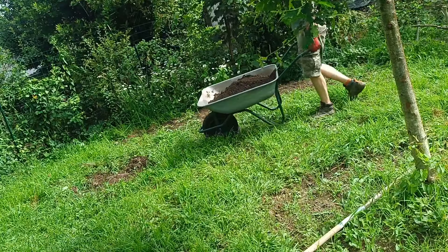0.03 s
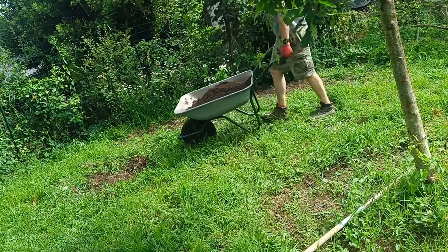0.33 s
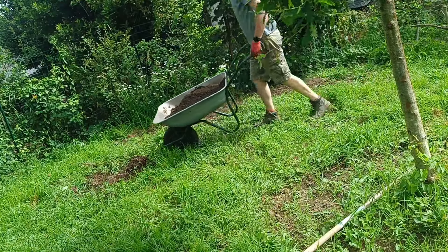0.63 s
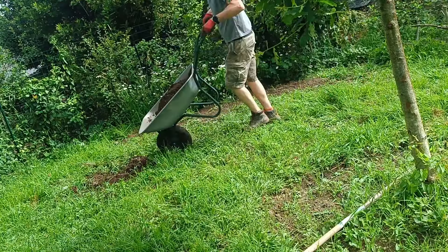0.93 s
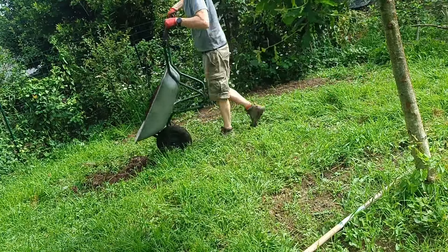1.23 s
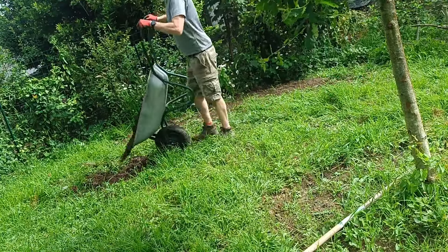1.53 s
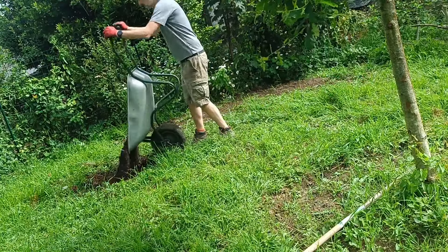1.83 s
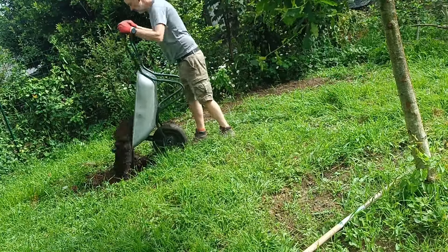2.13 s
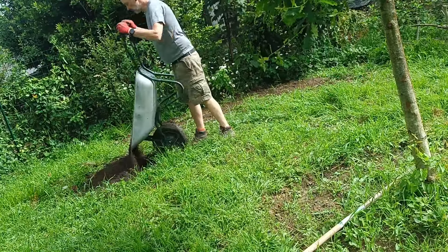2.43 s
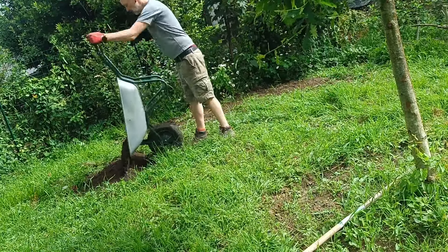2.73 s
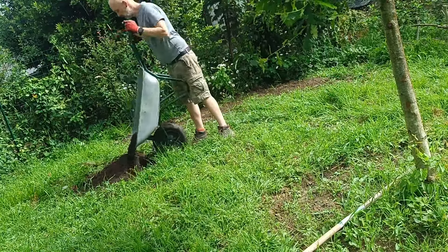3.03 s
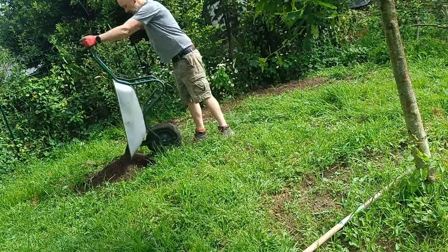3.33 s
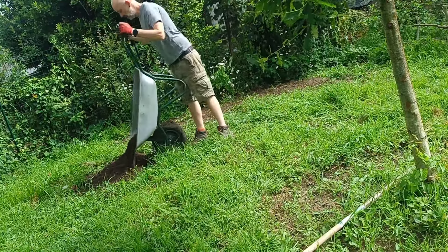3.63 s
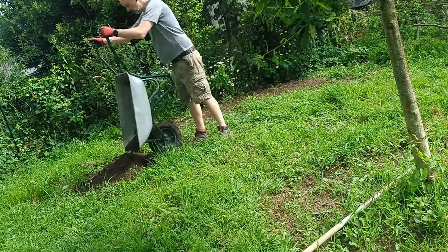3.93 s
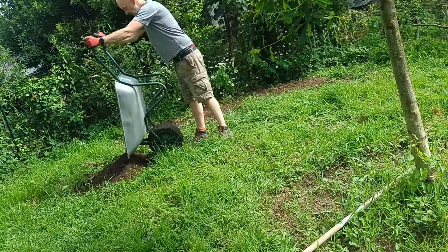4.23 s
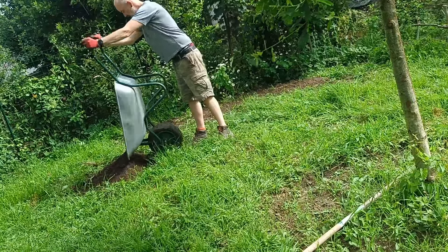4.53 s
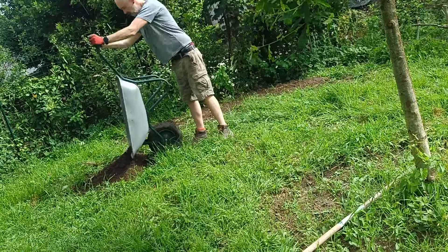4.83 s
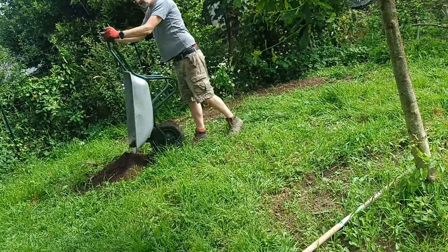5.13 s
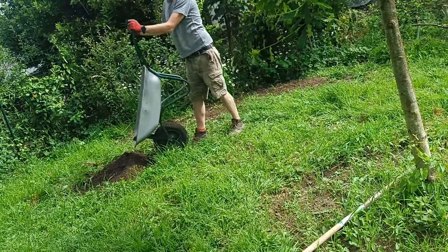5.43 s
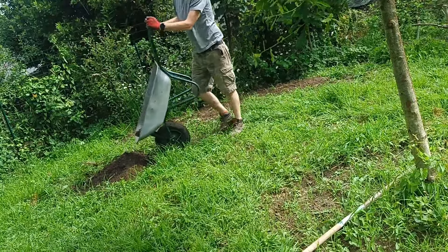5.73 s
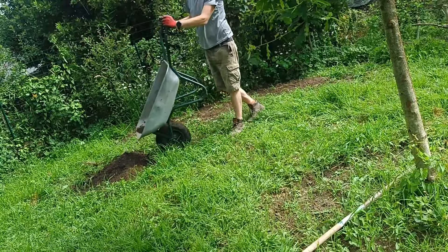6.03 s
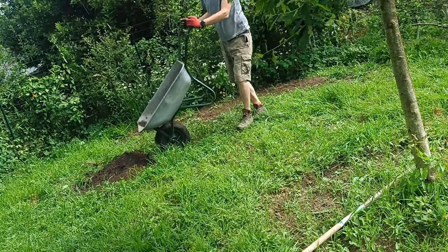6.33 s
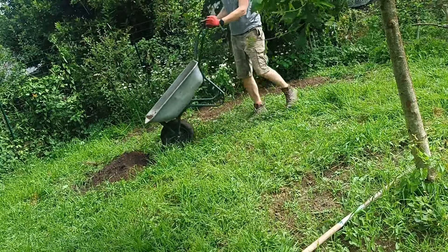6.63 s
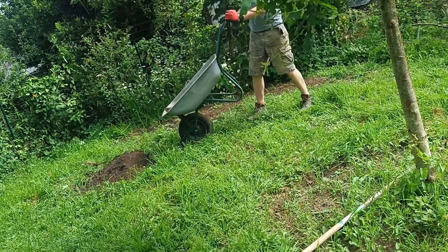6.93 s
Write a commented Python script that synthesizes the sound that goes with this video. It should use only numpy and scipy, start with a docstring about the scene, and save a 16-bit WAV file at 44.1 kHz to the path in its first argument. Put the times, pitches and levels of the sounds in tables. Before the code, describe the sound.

Close by, boots and a wheel brush through grass, then soil scrapes and slides out of a steel wheelbarrow in several pours. The tray clanks, and later rings with a quick cluster of knocks as it is emptied. Small birds trill and chirp in the garden hedges to the right, with a fluting song growing clearer in the second half. Light wind rumbles on the microphone, stronger toward the end.

```python
"""Tipping a wheelbarrow on a lawn

Close by on the left, boots and wheel brush the grass, soil slides off a steel tray in several pours,
and the tray rings as it is knocked empty. Further off to the right, small birds sing in the hedges,
their notes scattered by the foliage. A light wind buffets each of the two microphone ports on its own."""
import sys
import numpy as np
from scipy import signal
from scipy.fft import rfft, irfft, next_fast_len
from scipy.io import wavfile
from scipy.ndimage import map_coordinates

SR = 44100
rng = np.random.default_rng(int(sys.argv[2]) if len(sys.argv) > 2 else 0)


def materialize(psi):
    """Save the field psi as 16-bit PCM at rate SR to the path in sys.argv[1].

    A 1-D psi becomes a single channel; in a 2-D psi each row is a channel.
    """
    bounded = np.clip(np.atleast_2d(psi).T, -1, 1)
    quanta = np.round(bounded * 32767).astype(np.int16)
    wavfile.write(sys.argv[1], SR, quanta)


N = 308700
TIME = np.arange(N) / SR

# modes of the tray's steel panels: f/Hz, relative level/dB, t60/s
PANEL_MODES = [(260.5, -8, .45), (527, -3.5, 0.12), (651, -8.5, 0.26), (748, 1.5, 0.15), (842, -4.5, 0.22),
               (961, -11, 0.25), (1208, -10.5, 0.14), (1320, -2, 0.077), (1396, 3, 0.13)]
# how alike the barrow's direct sound is at the two ports: f/Hz, left-right correlation
NEAR_COHERENCE = [(800, 0.78), (7000, 0.078)]


def amp(db):
    """Decibels to gain."""
    return 10 ** (np.asarray(db) / 20)


def unit(x):
    """Scale to rms 1."""
    return x / np.sqrt(np.mean(x ** 2) + 1e-20)


def power_sum(gains):
    """Unrelated noises add by power."""
    return np.sqrt(sum(g ** 2 for g in gains))


def along(points, hz):
    """Read (f/Hz, value) points on a log frequency axis."""
    f, v = np.transpose(points)
    return np.interp(np.log(hz + 1), np.log(f + 1), v)


def curves(rows):
    """One value per sample for each column after the time."""
    s, *cols = np.transpose(rows)
    return [np.interp(TIME, s, c) for c in cols]


def wobble(rate, t=TIME):
    """A smooth random curve over the times t, rate knots a second."""
    return map_coordinates(rng.standard_normal(int(t[-1] * rate) + 4), [t * rate])


def surge(s, rise, hold, fall_db_per_s):
    """A gain that rises smoothly, holds, then dies away."""
    t = TIME - s
    onset = np.sin(np.pi / 2 * np.clip(t / rise, 0, 1)) ** 2
    return onset * amp(-fall_db_per_s * np.maximum(t - rise - hold, 0))


def filtered(x, response):
    """Pass x through a complex frequency response."""
    n = x.shape[-1]
    m = next_fast_len(n + 8192)
    return irfft(rfft(x, m) * response(np.fft.rfftfreq(m, 1 / SR)), m)[..., :n]


def add(track, s, sound):
    """Mix a sound into a track at time s."""
    part = track[..., max(round(s * SR), 0):][..., :sound.shape[-1]]
    part += sound[..., :part.shape[-1]]


def panned(side_db):
    """Left and right gains of mean power 1; positive side_db is to the left."""
    gains = np.array([np.atleast_1d(amp(side_db / 2)), np.atleast_1d(amp(-side_db / 2))])
    return gains / np.sqrt(np.mean(gains ** 2, axis=0))


def spread(pair, spectrum, coherence):
    """Colour two unrelated signals and blend them into a stereo pair of rms 1."""
    def response(hz):
        turn = np.arccos(np.clip(along(coherence, hz), -1, 1)) / 2
        return amp(along(spectrum, hz)) * [np.cos(turn), np.sin(turn)]
    mid, side = filtered(pair, response)
    return unit(np.array([mid + side, mid - side]))


def grains(rate, scatter_db, bed=1.0):
    """Tiny impacts of random size on a bed of countless smaller ones."""
    size_db = scatter_db * np.minimum(rng.exponential(size=N), 2)
    hits = (rng.random(N) < rate / SR) * amp(size_db)
    return unit(hits * rng.uniform(-1.29, 1, (2, N))) + bed * rng.standard_normal((2, N))


def burst(t, centre_hz, octaves, t60):
    """A dying band of noise, nearly alike on both ports."""
    band = lambda hz: 1 / (1 + np.abs(np.log2((hz + 1) / centre_hz) / octaves) ** 3)
    noise = rng.standard_normal(len(t)) + 0.062 * rng.standard_normal((2, len(t)))
    return unit(filtered(noise, band)) * amp(-60 * t / t60)


def note(length, start_hz, middle_hz, end_hz, quaver_hz=0, quaver_rate=55,
         rise=0.39, fall=0.1, waver=0.0067, flutter_db=3.5):
    """A nearly pure tone bending through three pitches; rise and fall are shares of its length."""
    t = np.arange(int(length * SR)) / SR
    progress = t / t[-1]
    drift, flutter = wobble(240.6, t), wobble(62, t)
    bend = np.polyval(np.polyfit([0, .5, 1], [start_hz, middle_hz, end_hz], 2), progress)
    hz = bend * (1 + waver * drift) + quaver_hz * np.sin(2 * np.pi * quaver_rate * t)
    swell = np.sin(np.pi / 2 * np.clip(np.minimum(progress / rise, (1 - progress) / fall), 0, 1))
    return np.sqrt(2) * swell * amp(flutter_db * flutter) * np.sin(2 * np.pi * np.cumsum(hz) / SR)


def glide(rows, edge_s=0.0053, waver=0.0041, flutter_db=-0.5):
    """A slightly wavering, fluttering tone along (t/s, f/Hz, level/dB) points."""
    s, hz, db = np.transpose(rows)
    t = np.arange(0, s[-1] - s[0], 1 / SR)
    edges = np.clip(np.minimum(t, t[-1] - t) / edge_s, 0, 1)
    pitch = np.interp(t + s[0], s, hz) * (1 + waver * wobble(313, t))
    level_db = np.interp(t + s[0], s, db) + flutter_db * wobble(175, t)
    return np.sqrt(2) * edges * amp(level_db) * np.sin(2 * np.pi * np.cumsum(pitch) / SR)


def in_hedge(call, side_db, near_db, far_db, near_t60=0.11, far_t60=0.6, lag_s=.00006):
    """A call from the right, scattered quickly by nearby leaves and faintly by the far trees."""
    t = np.arange(SR // 2) / SR
    decays = amp(-60 * t / np.array([near_t60, far_t60])[:, None, None])
    tails = rng.standard_normal((2, 2, len(t))) * decays * (1 - np.exp(-t / 0.0032))
    near, far = tails / np.linalg.norm(tails, axis=2, keepdims=True)
    paths = amp(near_db) * near + amp(far_db) * far
    paths[0, round(lag_s * SR)] += 1  # the direct sound reaches the left port later
    paths[1, 0] += 1
    return panned(side_db) * signal.fftconvolve(call[None], paths, axes=1)


def from_barrow(pair, lead_s=.0001):
    """The barrow stands to the left: that port hears it earlier and with another colour."""
    # balance between the ports: f/Hz, left minus right/dB
    balance = [(300, -0.5), (2400, 0), (4400, -6), (6500, -15), (8200, -2), (10000, 27), (15000, -18)]
    shift_s = lead_s / 2 * np.array([[1], [-1]])
    return filtered(pair, lambda hz: panned(along(balance, hz)) * np.exp(2j * np.pi * hz * shift_s))


def garden():
    """The steady faint hush of leaves and distance."""
    # the still garden: f/Hz, relative level/dB
    spectrum = [(120, -8), (200, -11.5), (695, -13.5), (4020, -33.5), (4640, -27), (8920, -77),
                (11200, -41), (15800, -39)]
    # sound arriving from all sides: f/Hz, left-right correlation
    coherence = [(100, 1), (400, 0.21), (1300, 0.047), (3000, 0.21), (7000, 0.18), (15000, 0.088)]
    return amp(-52.5 + 0.19 * wobble(3.4)) * spread(rng.standard_normal((2, N)), spectrum, coherence)


def far_birds():
    """Distant calls arrive mostly as scattered sound."""
    # t/s, length/s, f/Hz, relative level/dB, hoarseness as a share of the pitch
    calls = [(.43, .075, 4620, -58, .008), (.735, .1, 5820, -65, .015), (1.358, .03, 2150, -51, .11),
             (2.642, .0435, 2100, -57, .08), (3.47, .096, 2190, -60, .04)]
    out = np.zeros((2, N))
    for s, length, hz, db, hoarse in calls:
        call = note(length, hz, hz, hz, waver=hoarse, flutter_db=7.5)
        add(out, s, amp(db + 2) * in_hedge(call, -8, near_db=7.5, far_db=-19))
    return out


def whistler(start_hz=6780, end_hz=7380, length_s=1.77, pulse_hz=14.5, second_db=-9):
    """Well to the right, a thin whistle rises, pulses and roughens; a lower voice joins near its end."""
    # the whistle's loudness: t/s, relative level/dB
    loudness = [(0, -55), (.42, -43), (.62, -48), (1.3, -48), (1.55, -41), (1.71, -35.5), (1.76, -63.5)]
    db, = curves(loudness)
    progress = np.minimum(TIME / length_s, 1)
    hz = np.interp(np.sin(np.pi / 2 * progress) ** 2, [0, 1], [start_hz, end_hz])
    pulse = np.cos(2 * np.pi * pulse_hz * TIME + .5 * wobble(3.32))
    drift = 30 * wobble(12)
    roughness = (35 + 190 * progress ** 4) * wobble(400)
    phase = 2 * np.pi * np.cumsum(hz + 60 * pulse + drift + roughness) / SR
    voices = np.sin(phase) + amp(second_db) * progress ** 6 * np.sin(.9 * phase)
    tone = amp(db + 2 * wobble(90)) * (1 + .65 * pulse) * voices * (progress < 1)
    return in_hedge(tone, -18.5, near_db=7.5, far_db=-4, near_t60=0.21)[:, :N]


def triller(swell_db=5.5):
    """A distant trill: quick swelling hooks, then falling sweeps, each led by a pip, and a twitter."""
    # falling sweeps: t/s, relative level/dB
    sweeps = [(0.654, -43.5), (0.77, -41.5), (.88, -47.5), (0.987, -44.5), (1.096, -42)]
    # course of one sweep: t/s, f/Hz, relative level/dB
    sweep_shape = [(0, 4310, 1), (.009, 3680, 1), (.024, 2950, -6), (.046, 2270, -11)]
    # closing twitter: t/s, f/Hz, level/dB
    twitter = [(1.222, 3200, -43), (1.24, 3800, -42)]
    out = np.zeros((2, N))
    for s in np.linspace(.099, .574, num=9):
        effort_db = swell_db * np.exp(-((s - .4) / 0.16) ** 2)
        pip = note(0.0165, 4040, 4300, 3300)
        add(out, s - .018, amp(-51) * in_hedge(pip, -8, near_db=-10, far_db=-16))
        hook = note(0.022, 2880, 3310, 3330, fall=0.31, waver=0.013)
        add(out, s, amp(effort_db - 42.5) * in_hedge(hook, -1, near_db=-13, far_db=-14))
    for s, db in sweeps:
        pip = note(0.012, 4640, 4450, 4650)
        add(out, s - .022, amp(-53.5) * in_hedge(pip, -14, near_db=0, far_db=-8))
        sweep = glide(sweep_shape, waver=.025, flutter_db=3)
        add(out, s - .003, amp(db) * in_hedge(sweep, -3, near_db=-4, far_db=-13))
    for s, hz, db in twitter:
        call = note(0.011, hz, hz, hz, waver=.04)
        add(out, s, amp(db) * in_hedge(call, -2, near_db=-2, far_db=-14))
    return out


def chirpers():
    """Short high chirps and V-shaped calls from deep in the hedge."""
    # t/s, length/s, start f/Hz, middle f/Hz, end f/Hz, level/dB, left minus right/dB
    chirps = [(0.003, 0.016, 3870, 4850, 6200, -41, -9), (2.231, 0.026, 6800, 7280, 7480, -40, -21.5),
              (2.542, 0.029, 4580, 5830, 5880, -39, -14), (2.92, 0.031, 7600, 7880, 7600, -44, -23),
              (3.896, 0.027, 6140, 5680, 4720, -37.5, -8), (6.916, 0.0067, 4830, 6200, 7100, -24.5, -15),
              (6.922, 0.0039, 6230, 7100, 7500, -23, -24), (6.948, 0.0075, 5430, 6730, 7300, -21, -27),
              (6.955, 0.0051, 6500, 7150, 7550, -25, -14)]
    # calls that dip and rise in pitch: t/s, relative level/dB
    swoops = [(6.513, -66), (6.657, -54.5), (6.79, -50), (6.924, -46)]
    out = np.zeros((2, N))
    for s, length, start, middle, end, db, side_db in chirps:
        call = note(length, start, middle, end, waver=0.012)
        add(out, s, amp(db) * in_hedge(call, side_db, near_db=-4.5, far_db=-15))
    for s, db in swoops:
        call = np.concatenate([note(0.044, 6700, 4950, 4585), note(0.015, 4460, 5500, 7000)])
        add(out, s, amp(db) * in_hedge(call, -16, near_db=1, far_db=-12))
    return out


def songbird():
    """A fluting song just right of centre: soft notes, a loud glide, a quaver, one phrase three times."""
    # single notes: t/s, length/s, start f/Hz, middle f/Hz, end f/Hz, level/dB
    notes = [(2.333, 0.091, 2160, 2590, 2280, -40.5), (2.695, .1, 3090, 3490, 3830, -40),
             (3.218, 0.091, 4640, 4560, 4260, -47), (3.259, .1, 4500, 3340, 2880, -46),
             (3.725, 0.047, 4250, 4030, 3860, -42), (3.789, 0.038, 4460, 5070, 4850, -35.5),
             (3.937, 0.094, 3310, 3480, 3377, -38), (4.199, 0.027, 2850, 3030, 3170, -41.5),
             (4.583, 0.052, 2624, 2528, 2440, -30.5), (5.95, 0.078, 2190, 2956, 3076, -30.5),
             (6.074, 0.031, 2280, 2240, 2280, -40.5)]
    # one arching, falling slur, repeated ever softer: t/s, relative level/dB
    slurs = [(2.833, -27.5), (3.001, -35), (3.108, -39.5)]
    # course of that slur: t/s, f/Hz, relative level/dB
    slur_shape = [(0, 2870, -21), (.022, 3204, -5), (.042, 2764, -5.5), (.058, 2480, 1.5), (.07, 2460, -27)]
    # the song's peak, an S-shaped glide: t/s, f/Hz, relative level/dB
    peak = [(4.335, 3750, -34), (4.365, 3680, -25.5), (4.405, 3025, -23.5), (4.431, 3013, -25),
            (4.445, 3180, -23)]
    # quavering note: t/s, length/s, f/Hz, level/dB
    warble = [(4.513, .085, 2550, -32)]
    # two rising steps and a fall: delay/s, length/s, start f/Hz, middle f/Hz, end f/Hz, level/dB
    phrase = [(0, 0.091, 3423, 3400, 3495, -30), (0.078, 0.068, 3660, 3576, 3633, -30),
              (0.196, .092, 3000, 2850, 2420, -31)]
    # each delivery of the phrase: t/s, time stretch, gain/dB
    repeats = [(4.752, 0.98, -1.5), (5.15, 0.86, -3), (5.515, 1.02, -3)]
    soft = [(s, amp(db) * note(length, start, middle, end, waver=0.0054, flutter_db=4))
            for s, length, start, middle, end, db in notes]
    soft += [(s, amp(db) * glide(slur_shape, waver=0.016)) for s, db in slurs]
    full = [(peak[0][0], amp(-0.5) * glide(peak))]
    full += [(s, amp(db) * note(length, hz, hz, hz, quaver_hz=188)) for s, length, hz, db in warble]
    for s, stretch, gain_db in repeats:
        for delay, length, start, middle, end, db in phrase:
            call = note(stretch * length, start, middle, end, rise=0.33)
            full.append((s + stretch * delay, amp(db + gain_db) * call))
    out = np.zeros((2, N))
    for s, call in soft:
        add(out, s, in_hedge(call, -2, near_db=-4.5, far_db=-21.5, near_t60=0.16))
    for s, call in full:
        add(out, s, in_hedge(call, -2.8, near_db=-4.5, far_db=-13))
    return out


def wind(cycles=0.49, lumpy_db=5.5, wake_db=-15, wake_s=0.034):
    """Each port rumbles on its own; single eddies thump on one of them inside a patch of turbulence."""
    # wind strength: t/s, relative level/dB
    breeze = [(0, -48.5), (.6, -43.5), (2.9, -39), (3.6, -40), (4.05, -36), (5.2, -28.5), (5.7, -28.5),
              (5.85, -36.5), (6.4, -30.5), (7, -35)]
    # eddies: t/s, level/dB, f/Hz, port (0 left, 1 right)
    puffs = [(.566, -18.5, 65, 1), (2.197, -15.5, 49.6, 1), (2.412, -15, 69.6, 0), (2.561, -12.5, 60, 0),
             (2.914, -9, 64.4, 0), (3.052, -14, 50, 1), (3.9, -9.5, 42.4, 1), (4.007, -12.5, 100, 1),
             (4.381, -4, 74, 1), (4.605, -4.5, 49.7, 0), (4.869, -6.5, 89, 1), (4.991, -3.5, 49.6, 0),
             (5.231, -2.5, 106, 0), (5.238, -6, 66.5, 1), (5.295, -4, 101, 0), (5.355, -7.5, 42, 0),
             (5.603, -3.5, 73, 1), (5.618, -2.5, 126.8, 0), (5.711, -7, 115, 0), (5.775, 3.5, 83, 0),
             (5.937, -4.5, 64, 0), (6.121, -5, 91, 0), (6.353, -6.5, 65, 0), (6.676, -10.5, 120, 0),
             (6.699, -6, 110, 0), (6.768, -10.5, 94, 0)]
    # turbulence at a port: f/Hz, relative level/dB
    spectrum = [(15, -10.5), (35, 2.5), (60, 2), (100, -6), (170, -20), (300, -43), (700, -63)]
    breeze_db, = curves(breeze)
    lumps = unit(amp(lumpy_db * np.array([wobble(12), wobble(16)])))
    eddies, wakes = np.zeros((2, 2, N))
    t = np.arange(-SR // 8, SR // 8) / SR
    for s, db, hz, port in puffs:
        # pressure swings up, then down as the eddy passes
        swing = -np.sin(2 * np.pi * hz * t + rng.normal(0, 0.63)) / np.cosh(t * hz / cycles * np.pi / 2)
        add(eddies[int(port)], s + t[0], amp(db) * swing)
        add(wakes[int(port)], s + t[0], amp(db + wake_db) * np.exp(-(t / wake_s) ** 2))
    turbulence = unit(filtered(rng.standard_normal((2, N)), lambda hz: amp(along(spectrum, hz))))
    ragged = 1 + .13 * wobble(240)
    return power_sum([amp(breeze_db + 3) * lumps, wakes]) * turbulence + eddies * ragged


def lawn():
    """Boots and wheel crunch dully on the turf and swish through the blades."""
    # constant light shuffling: t/s, turf level/dB, relative grass level/dB
    shuffling = [(0, -56, -67), (.6, -45.5, -55.5), (.92, -55, -63), (1.15, -47.5, -59),
                 (2.4, -51.5, -56.5), (3.2, -51, -70), (4.7, -51.5, -62), (5.15, -50.5, -69.5),
                 (7, -54.5, -67.5)]
    # boots and tyre press the turf: t/s, hold/s, level/dB
    scuffs = [(0.31, 0.14, -43), (0.57, 0.29, -56), (1.182, 0.03, -41.5), (3.874, 0.09, -47),
              (4.734, 0.14, -43), (5.543, 0.22, -44), (6.922, .05, -45.5)]
    # wheel and legs sweep the grass: t/s, hold/s, relative level/dB
    swishes = [(0.106, 0.1, -57), (0.295, 0.16, -40), (1.192, 0.05, -53), (5.593, 0.13, -55.5),
               (5.738, 0.057, -47), (6.818, 0.19, -59)]
    # pressed turf: f/Hz, relative level/dB
    turf_spectrum = [(60, 1), (160, -5.5), (350, 3), (750, -5.5), (1350, -4), (7000, -22), (12000, -35)]
    # blades brushing past: f/Hz, relative level/dB
    grass_spectrum = [(1500, -9.5), (6500, 3), (9200, 7.5), (11500, -1.5)]
    turf_db, grass_db = curves(shuffling)
    presses = [amp(db) * surge(s, 0.025, hold, fall_db_per_s=150) for s, hold, db in scuffs]
    sweeps = [amp(db) * surge(s, 0.014, hold, fall_db_per_s=420) for s, hold, db in swishes]
    press = power_sum([amp(turf_db + 2.2 * wobble(12))] + presses)
    sweep = power_sum([amp(grass_db + 0.76 * wobble(9.6))] + sweeps)
    press *= amp(0.07 * wobble(55))
    crunch = spread(grains(rate=450, scatter_db=3.5), turf_spectrum, NEAR_COHERENCE)
    sweep *= amp(3 + 2.3 * wobble(60))
    swish = spread(grains(rate=870, scatter_db=1, bed=1.7), grass_spectrum, NEAR_COHERENCE)
    return from_barrow(press * crunch + sweep * swish)


def twigs_and_grit(centre_hz=7000, octaves=0.61, twig_t60=0.071, grit_t60=0.0091, scatter_db=4, count=18):
    """Twigs snap, and bits of grit crackle at random, each with its own size and pitch."""
    # twigs: t/s, level/dB
    snaps = [(3.012, -52), (3.873, -50), (4.125, -43.5), (4.855, -40.5), (5.419, -48.5), (6.116, -48.5)]
    # spells of loose grit: start t/s, end t/s, level/dB
    patter = [(3.796, 4.205, -42), (4.217, 4.448, -40.5), (5.62, 6.049, -44)]
    out, t = np.zeros((2, N)), np.arange(SR // 20) / SR
    for s, db in snaps:
        add(out, s, amp(db) * burst(t, centre_hz, octaves, twig_t60))
    for start, end, db in patter:
        for when, (size, pitch) in zip(rng.random(count), rng.uniform(-1.16, 1, (count, 2))):
            tick = burst(t, centre_hz * 2 ** (pitch - .5), octaves / 2, grit_t60)
            add(out, start + when * (end - start), amp(db + scatter_db * size) * tick)
    return from_barrow(out)


def scrape(width_hz=400, rough_db=2):
    """A narrow, gritty band of friction sinks in pitch as the load slides over the lip."""
    # soil on steel: t/s, centre f/Hz, level/dB
    friction = [(1.42, 3680, -60), (1.53, 3470, -37.5), (1.62, 2835, -35), (1.77, 2270, -81)]
    hz, db = curves(friction)
    phase = 2 * np.pi * np.cumsum(hz) / SR
    band = unit(wobble(2 * width_hz) * np.sin(phase) + wobble(2 * width_hz) * np.cos(phase))
    sliding = (TIME > friction[0][0]) & (TIME < friction[-1][0])
    return from_barrow((sliding * amp(db + rough_db * wobble(90)) * band)[None])


def tray_knocks(octaves=0.52, ring_db=-9, detune=0.0073, loaded_db=-7.5, empty_s=3.6):
    """Each blow clatters and rings the panels a little differently; soil mutes the ring until empty_s."""
    # blows on the tray: t/s, level/dB, clatter centre f/Hz, clatter t60/s
    knocks = [(.174, -41, 900, .045), (0.419, -27.5, 1030, 0.037), (0.59, -38.5, 1660, 0.22),
              (1.218, -38, 790, 0.06), (1.899, -33, 1380, 0.052), (2.059, -19.5, 1200, 0.16),
              (2.145, -28, 1080, 0.27), (2.261, -37.5, 2010, 0.086), (3.013, -36.5, 1010, 0.13),
              (4.238, -28.5, 1600, 0.16), (4.254, -18, 950, 0.11), (4.365, -26, 1130, 0.14),
              (4.382, -16.5, 1040, 0.072), (4.856, -31, 1080, 0.077)]
    out, t = np.zeros((2, N)), np.arange(SR // 2) / SR
    attack = 1 - np.exp(-t / 0.0013)
    for s, db, centre_hz, clatter_t60 in knocks:
        ring = np.zeros_like(t)
        for hz, mode_db, t60 in PANEL_MODES:
            decay = amp(mode_db + rng.normal(0, 1.6) - 60 * t / t60)
            pitch = hz * (1 + detune * rng.normal())
            ring += decay * np.sin(2 * np.pi * (pitch * t + rng.random()))
        ring *= amp(ring_db + loaded_db * (s < empty_s))
        clatter = burst(t, centre_hz, octaves, clatter_t60)
        add(out, s, amp(db) * (clatter + ring) * attack)
    return from_barrow(out)


def soil(panel_ring=0.6, half_width_hz=24, clod_fall_db_per_s=141, hiss_fall_db_per_s=204):
    """Clods tumble in clumps down the tray, coloured by its panels; crumbs hiss and settle sooner."""
    # soil lets go and slides: t/s, rise/s, hold/s, clod level/dB, relative crumb level/dB
    pours = [(1.34, 0.085, 0.071, -38, -44), (1.421, 0.24, 0.067, -30, -34),
             (1.744, 0.062, 0.09, -50, -46.5), (1.975, 0.1, 0.059, -25.5, -27.5),
             (2.346, 0.05, 0.007, -48.5, -52.5), (2.683, 0.074, 0.094, -34.5, -37.5),
             (3.352, 0.099, 0.034, -41.5, -50.5), (4.206, 0.045, 0.046, -33.5, -42.5),
             (4.303, 0.034, 0.074, -34, -48), (4.477, 0.064, 0.048, -38.5, -50.5),
             (5.909, 0.061, 0.013, -43.5, -44)]
    # tumbling clods: f/Hz, relative level/dB
    clod_spectrum = [(60, 4.5), (160, -0.5), (300, -3.5), (750, -2.5), (1350, -1.5), (2400, -5),
                     (7000, -26.5), (12000, -52)]
    # fine crumbs: f/Hz, relative level/dB
    crumb_spectrum = [(1200, -3), (2500, 3), (4500, 2.5), (6500, 3), (9000, 7), (11500, -9.5),
                      (14000, -3.5), (15800, -8)]

    def panels(f):
        modes = sum(amp(db) / (1 + 1j * (f - hz) / half_width_hz) for hz, db, _ in PANEL_MODES)
        return 1 + panel_ring * modes

    clods = spread(grains(rate=500, scatter_db=4), clod_spectrum, NEAR_COHERENCE)
    tumble = unit(filtered(clods, panels))
    hiss = spread(grains(rate=1800, scatter_db=2), crumb_spectrum, NEAR_COHERENCE)
    tumble *= power_sum(amp(db) * surge(s, rise, hold, clod_fall_db_per_s)
                        for s, rise, hold, db, _ in pours)
    hiss *= power_sum(amp(db) * surge(s, rise, hold, hiss_fall_db_per_s)
                      for s, rise, hold, _, db in pours)
    clumps = amp(1.3 * wobble(70))
    return from_barrow(clumps * (tumble + amp(3.5) * hiss))


def scene():
    """Birds to the right, the barrow close on the left, wind on the microphone."""
    birds = songbird() + chirpers() + triller() + whistler() + far_birds()
    barrow = soil() + scrape() + lawn() + tray_knocks() + twigs_and_grit()
    return birds + barrow + wind() + garden()


def record(dry, top_hz=15950):
    """The recorder clips at full scale and keeps nothing above its band limit."""
    return filtered(np.clip(dry, -1, 1), lambda hz: hz < top_hz)


dry = scene()
out = record(dry)
materialize(out)
```